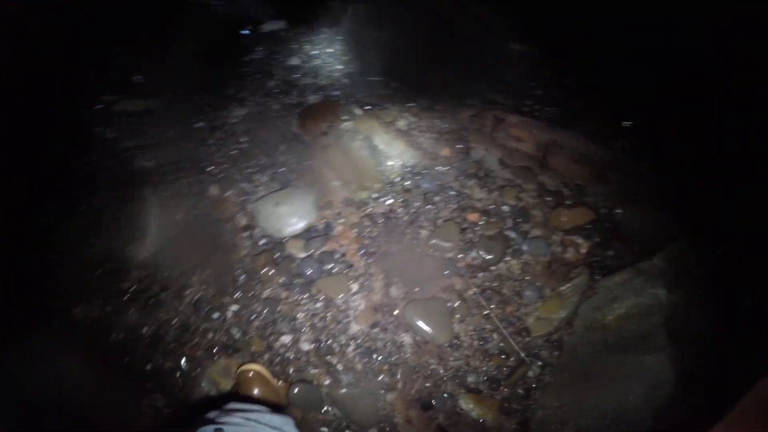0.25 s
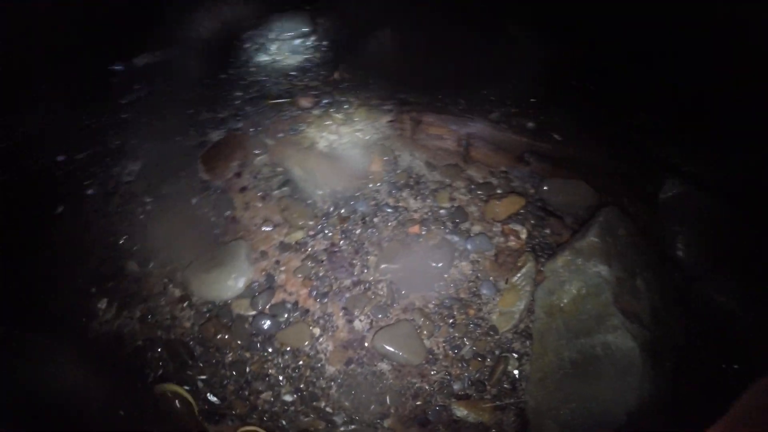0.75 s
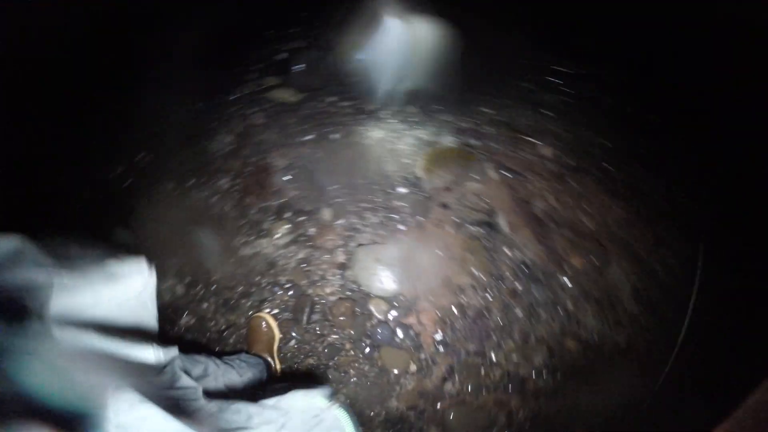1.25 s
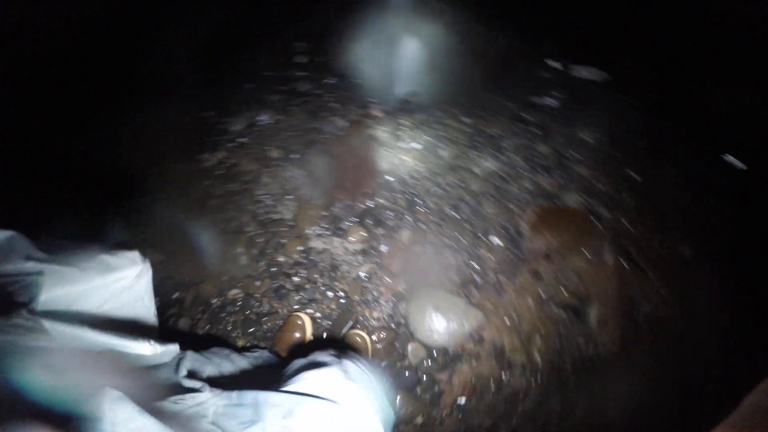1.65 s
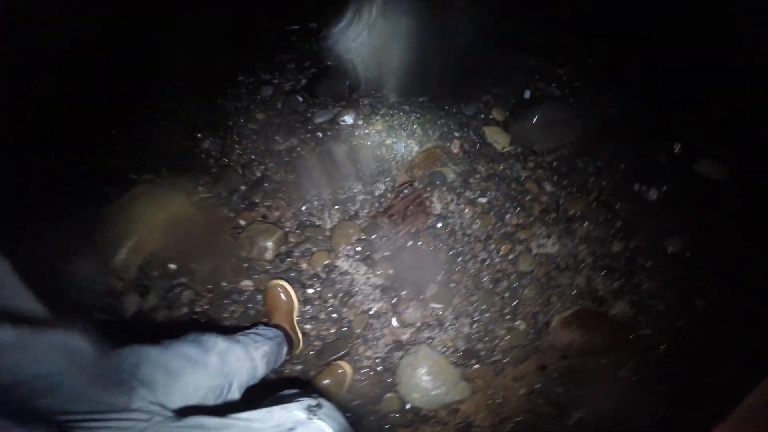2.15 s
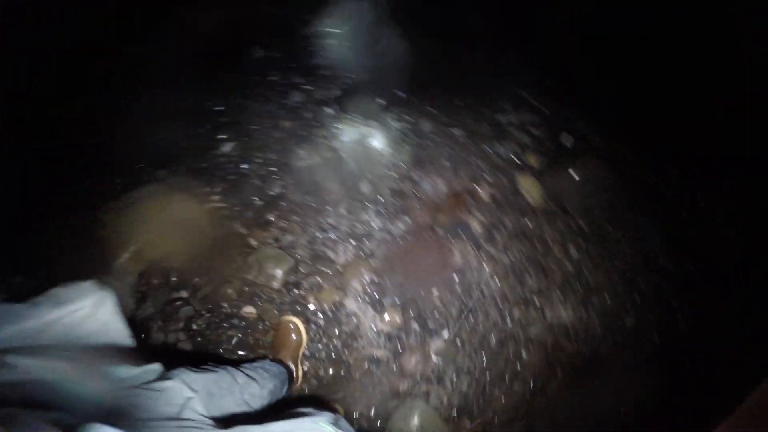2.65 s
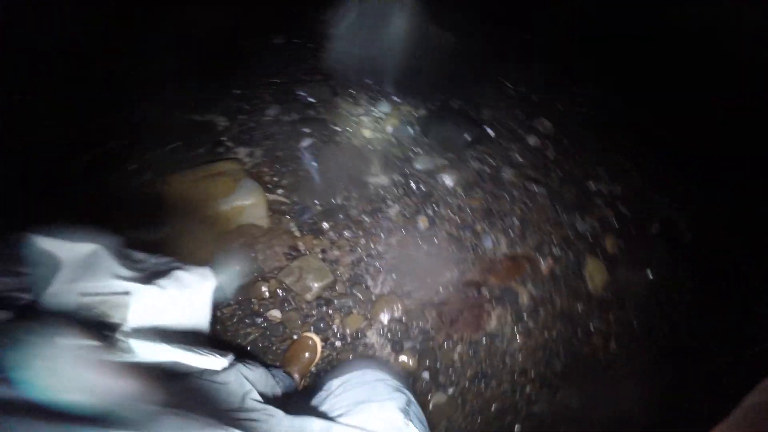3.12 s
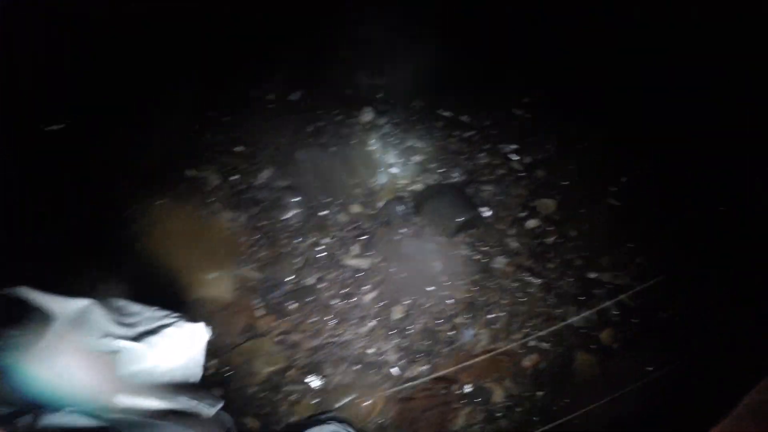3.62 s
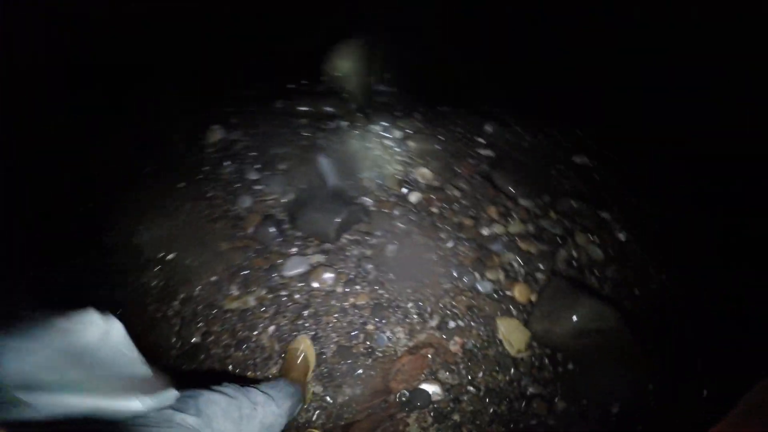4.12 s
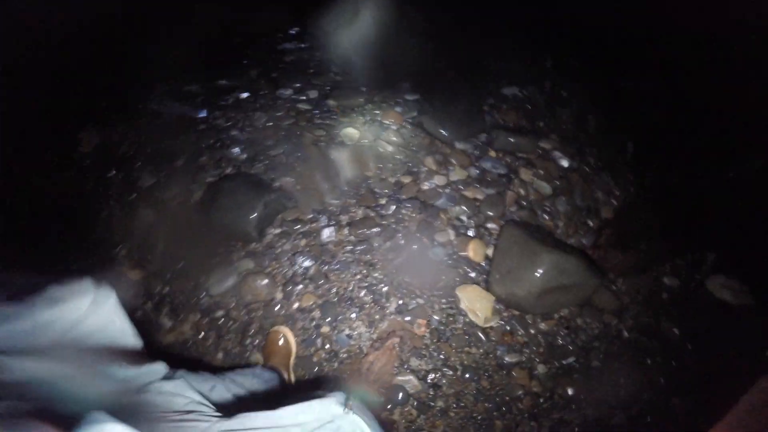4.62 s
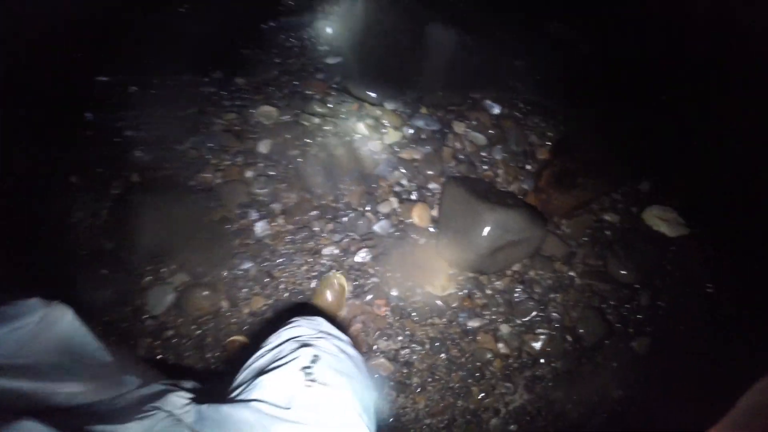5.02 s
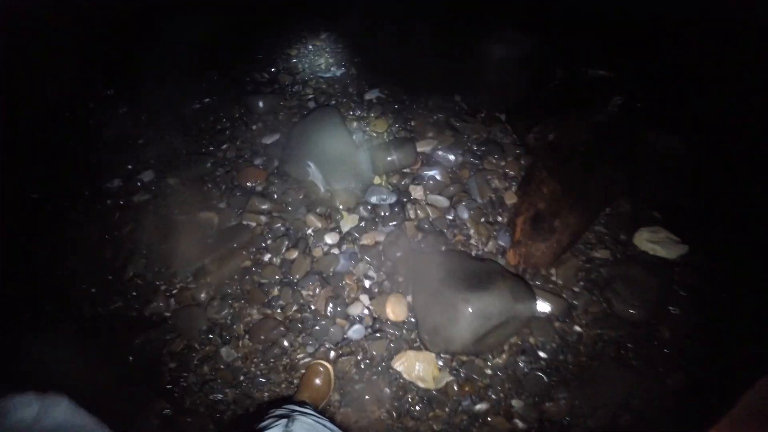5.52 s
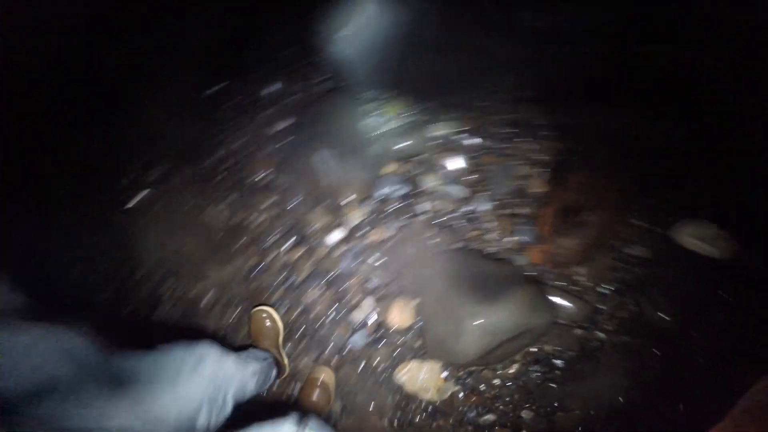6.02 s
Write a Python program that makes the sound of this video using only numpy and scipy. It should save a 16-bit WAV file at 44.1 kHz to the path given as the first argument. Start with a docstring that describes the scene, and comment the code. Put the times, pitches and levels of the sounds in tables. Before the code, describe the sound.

Strong wind rumbles and rushes hollowly around a small camera in a closed case, over a soft wash of air and far surf. Someone walks on wet pebbles: low jolts, cloth rubs and heel thumps. Stones tick, then one violent clack distorts near one second; gravel crunches, and smaller clicks continue until the end.

```python
"""On a wet pebble beach at night, one microphone sits in the closed housing of a small carried camera.
From the start strong wind buffets it, rushes in the cavities and washes broadly; electronics whine faintly.
From 0.1 s filtered noise gives jolts and cloth rubs on the shell, and decaying sines give low thumps of heels.
From 0.7 s noise bursts tick and struck resonances clack as stones, the loudest near 1.1 s with a low thud; from
about 1 s grainy noise grinds as gravel. Peaks clip; a steep low-pass leaves nothing above about 15.4 kHz."""
import sys
import numpy as np
from scipy import signal
from scipy.fft import rfft, irfft
from scipy.io import wavfile
from scipy.ndimage import uniform_filter1d

SR = 44100
rng = np.random.default_rng(int(sys.argv[2]) if len(sys.argv) > 2 else 0)


def put_to_file(sound):
    """Save the sound as 16-bit audio at rate SR, in the file named by the first command-line argument."""
    columns = np.atleast_2d(sound).T  # one column per channel
    safe = np.clip(columns, -1, 1)
    whole_steps = np.round(safe * 32767)
    wavfile.write(sys.argv[1], SR, whole_steps.astype(np.int16))


N = 276507  # length [samples]

# In the mode tables in Hz, width is that of each of two cascaded resonances before a common 0.98 factor;
# stone modes ring once. Levels of these modes and of the spectra are relative: each noise is scaled to rms 1.

# Slow wind buffeting of the membrane, before gusts: (time [s], level [dB])
BUFFET_LEVEL = [(0.0, -32), (0.17, -28), (0.28, -44), (1.2, -33.5), (1.68, -40.5), (2.79, -33.5),
                (2.85, -40), (3.12, -35), (3.18, -42.5), (3.53, -24), (3.67, -28), (3.7, -22.5),
                (3.82, -39), (4.3, -32.5), (4.4, -40), (4.61, -26), (4.73, -38), (5.69, -35.5),
                (5.73, -33.5), (6.08, -41), (6.2, -38), (6.27, -38.5)]
# Spectrum of the buffeting: (frequency [Hz], relative density [dB per Hz])
BUFFET_SPECTRUM = [(8, 6), (15, -2.5), (26, -2.5), (40, -6.5), (60, -13), (120, -59)]
GUST_SPREAD_DB, GUSTS_PER_S = 1.8, 9
# Wind rushing in the cavities: (time [s], level [dB])
RUSH_LEVEL = [(0, -54.5), (.9, -56.5), (1.34, -54.5), (1.8, -49), (2.3, -50.5), (4.0, -50), (6.27, -49.5)]
# Cavity modes of the housing: (frequency [Hz], width [Hz], relative level [dB])
CAVITY_MODES = [(1838, 510, 3.5), (2015, 150, -21), (2672, 584, 2.5), (3158, 174, -6), (4770, 220, -14),
                (5530, 720, -10), (6400, 340, -29)]
# Spectrum of the air and far surf: (frequency [Hz], relative density [dB per Hz])
WASH_SPECTRUM = [(100, -8), (200, 2), (300, -1.5), (500, -3), (1000, -6), (1300, -9), (2300, -22),
                 (4100, -39.5), (7500, -26), (10000, -28.5), (12000, -27.5), (14000, -41), (15000, -38)]
WASH_DB = -57.5  # typical level, before its flicker

# Whines of the electronics, before their wavering: (frequency [Hz], level [dB rms])
WHINES = [(5846, -81), (8780, -85), (11687, -91), (11719, -86), (14595, -99), (14626, -85), (14655, -94)]

# Jolts from the steps: (time [s], hold [s], swing of the case [dB], rattle of its mount [dB])
JOLTS = [(.13, 0.03, -38, -38), (.21, .03, -40, -52), (.29, 0.052, -37, -44), (.465, 0.0098, -40.5, -46),
         (1.05, 0.1, -37, -40.5), (1.17, .13, -36, -38.5), (1.46, 0.083, -39.5, -55),
         (1.62, 0.016, -36.5, -41.5), (1.7, 0.024, -33, -46.5), (1.78, 0.023, -40, -54),
         (1.9, 0.0044, -37, -51), (2.15, 0.026, -38.5, -41.5), (2.355, 0.061, -39, -43),
         (2.415, .04, -35, -40), (2.52, 0.065, -41, -45.5), (2.95, .005, -44, -62),
         (3.03, 0.018, -39, -48.5), (3.22, 0.053, -41, -48), (3.39, .005, -39, -47),
         (3.47, 0.065, -38.5, -48), (3.703, .03, -30, -39), (3.76, .01, -32.5, -47),
         (4.42, 0.026, -42.5, -54), (4.47, 0.069, -36.5, -37), (4.59, 0.083, -40.5, -46.5),
         (4.91, 0.0046, -38, -66), (4.99, 0.0057, -39, -58), (5.1, 0.026, -46, -45.5),
         (5.767, 0.0035, -36.5, -41.5), (5.83, .01, -47, -46), (5.877, 0.016, -36.5, -42),
         (5.963, .005, -39, -42.5), (6.045, 0.038, -37.5, -37)]
# Modes of the swinging case: (frequency [Hz], width [Hz], relative level [dB])
CASE_MODES = [(77.6, 35, -2.5), (98, 34.8, -1.5), (121, 56, -9)]
# Modes of the rattling mount: (frequency [Hz], width [Hz], relative level [dB])
MOUNT_MODES = [(201.2, 61, 2.5), (254.4, 46, -5), (297, 53, -14.5), (410, 1100, -16.5)]
JOLT_ATTACK_S, JOLT_RELEASE_S = 0.009, 0.032
SWING_REST_DB, RATTLE_REST_DB = -50.5, -55.5

# Cloth slipping on the shell: (time [s], hold [s], low panels [dB], high panels [dB])
SLIPS = [(.14, 0.021, -49, -54), (.21, 0.011, -54, -52), (.29, 0.037, -48.5, -51.5),
         (.47, 0.0041, -53.5, -61), (.73, 0.0032, -55, -52), (1.05, 0.085, -49.5, -49.5),
         (1.165, 0.012, -46, -51), (1.22, 0.086, -53, -51.5), (1.73, 0.0041, -57, -53),
         (2.19, 0.054, -60, -49.5), (2.385, 0.066, -48, -47), (2.48, .03, -69, -51), (2.56, .005, -54, -53),
         (2.6, 0.0045, -55.5, -56), (3.16, 0.0074, -53, -56), (3.22, .005, -55, -50),
         (3.38, 0.033, -49.5, -45.5), (3.475, 0.073, -48.5, -47), (3.712, 0.011, -42.5, -39.5),
         (4.47, 0.12, -52.5, -46.5), (4.6, 0.028, -51.5, -47), (4.7, 0.0041, -57, -62),
         (4.82, 0.0045, -54, -57), (4.89, .005, -56, -60), (5.88, 0.0054, -55, -50),
         (5.958, .002, -50, -61), (6.08, 0.015, -49.5, -49.5)]
# Modes of the low shell panels: (frequency [Hz], width [Hz], relative level [dB])
LOW_PANEL_MODES = [(664, 122, -5.5), (728, 160, -3), (967, 89, 3), (1059, 57, -1.5)]
# Modes of the high shell panels: (frequency [Hz], width [Hz], relative level [dB])
HIGH_PANEL_MODES = [(1499, 27, 0), (1571, 174, 6.5), (1920, 200, 2.5), (2360, 510, 4), (2820, 450, 1),
                    (3270, 190, -9)]
SLIP_ATTACK_S, SLIP_RELEASE_S = 0.007, 0.027
LOW_REST_DB, HIGH_REST_DB = -69, -61.5

# Low thumps of heels, and the low thud under the loudest clack:
# (time [s], peak [dB], ring [Hz], 60 dB decay time [s])
THUMPS = [(0.15, -26, 115, 0.054), (1.1086, -16, 264, 0.015), (1.256, -29.5, 107.4, 0.18),
          (3.536, -21, 70, 0.059), (3.701, -16, 87, 0.086), (4.532, -22, 97, 0.15),
          (5.764, -31.5, 170, 0.035), (5.874, -31.5, 117, 0.094), (4.26, -34, 73, 0.059),
          (6.078, -36, 130, 0.32)]

# Small treble ticks: (time [s], peak [dB], ring [Hz])
TICKS = [(0.7342, -52, 8090), (0.9695, -38.5, 7700), (2.578, -48, 9240), (2.6668, -63, 8770),
         (2.7536, -53, 9720), (2.8484, -55, 9960), (2.9098, -58, 10000), (3.4695, -57, 8770),
         (3.5, -52, 8690), (3.5817, -45, 8900), (3.5987, -48, 9650), (3.6564, -42.5, 9100),
         (3.6684, -47, 9600), (3.696, -58, 8860), (5.855, -41, 8200), (6.0854, -49, 7650),
         (6.223, -47, 7650)]

# Stone clacks: (time [s], peak [dB], ring [Hz], crack relative to the peak [dB],
# rebound delay [s], rebound relative to the first touch [dB])
CLACKS = [(0.7353, -24.5, 2720, -31, 0.0008, -26), (0.969, -19, 1860, -22, 0.00078, 3.5),
          (.995, -35, 4600, -8, 0.00048, 2), (1.1096, 1.2, 1820, -28, .00079, 7.5),
          (1.241, -30.5, 2030, -24, 0.00055, 9), (1.718, -31.5, 2860, -25, 0.00035, -7),
          (1.9557, -30.5, 2120, -21, 0.00053, 12), (2.499, -48, 4700, -20, .0005, 6),
          (2.619, -36, 4500, -17, 0.00058, 1), (2.679, -42, 4000, -18, .0005, 1),
          (3.036, -47, 4900, -20, .0005, 1), (3.113, -39, 4800, -20, 0.00057, 1),
          (3.067, -34, 4800, -14, 0.00061, 3), (3.088, -33, 3120, -20, 0.00063, 1),
          (3.715, -28, 2340, -32, 0.00125, 0), (3.9084, -18, 2640, -18, 0.00059, 9),
          (5.469, -36, 2650, -24, 0.00037, 2), (5.8551, -29.5, 2480, -17, 0.0002, 4),
          (6.086, -34, 4650, -14, 0.0006, 12), (6.2228, -27.5, 2800, -28, 0.00044, 13)]
# Modes of a stone: (share of the ring frequency [ratio], width as share of the mode frequency [ratio],
# level before weighting by share / width [dB])
STONE_MODES = [(.135, 0.79, -57), (.85, 0.077, -27.5), (1.03, 0.24, 28.5), (1.28, 0.089, 2),
               (2.03, 0.092, 1), (2.7, 0.11, -5)]

# Gravel grinding under a boot: (time [s], hold [s], level [dB])
CRUNCHES = [(.98, 0.11, -58.5), (1.1, .005, -54.5), (1.17, 0.029, -56), (1.31, 0.012, -56.5),
            (1.69, 0.011, -48), (1.75, 0.067, -59.5), (1.9, .005, -58), (2.0, .005, -64), (2.32, .01, -65),
            (2.39, 0.098, -57), (2.603, 0.012, -51.5), (2.68, 0.0092, -59), (3.034, .1, -54.5),
            (3.61, .02, -62), (3.67, .005, -61), (4.49, 0.016, -56.5), (4.79, .005, -61),
            (5.41, 0.018, -61.5), (5.468, 0.0062, -53.5), (5.57, .002, -58), (5.63, 0.027, -57.5),
            (5.71, 0.043, -64), (6.09, .005, -64), (6.23, .01, -68)]
# Modes of the gravel: (frequency [Hz], width [Hz], relative level [dB])
GRAVEL_MODES = [(3080, 880, 6), (4960, 1500, -1), (5400, 1070, 7.5), (6130, 520, 3), (8030, 3000, -3.5),
                (9630, 540, -11), (11700, 4800, -13)]
CRUNCH_ATTACK_S, CRUNCH_RELEASE_S, CRUNCH_REST_DB = 0.005, 0.042, -67.5

TOP_HZ = 15400  # upper edge of the sound


def undb(db):
    """Gain of a level in dB."""
    return 10 ** (np.asarray(db) / 20)


def unit(x):
    """Scaled to rms 1."""
    return x / np.sqrt(np.mean(x ** 2))


def level_curve(table):
    """Gain at every sample, interpolated in dB between the points of a table."""
    s, db = np.transpose(table)
    return undb(np.interp(np.arange(N) / SR, s, db))


def ring(x, hz, width):
    """Two-pole resonance, gain 1 at the centre."""
    hz = min(hz, SR / 2.2)
    b, a = signal.iirpeak(hz, hz / max(width, 1), fs=SR)
    return signal.lfilter(b, a, x)


def ring_twice(x, hz, width):
    """Two equal resonances in a row, for steeper skirts."""
    return ring(ring(x, hz, width), hz, width)


def walk(rate):
    """Random levels held 1 / rate s, then smoothed twice over that time; rms 1."""
    k = int(SR / rate)
    held = rng.standard_normal(1024)[np.arange(N) // k % 1024]
    return unit(uniform_filter1d(uniform_filter1d(held, k), k))


def coloured(points):
    """Steady noise with a given spectrum, rms 1."""
    hz, db = np.transpose(points)
    f = np.maximum(np.fft.rfftfreq(N, 1 / SR), 1)
    gain = undb(np.interp(np.log(f), np.log(hz), db, left=-80, right=-80))
    return unit(irfft(rfft(rng.standard_normal(N)) * gain, N))


def flickering_noise(spread_db, rate):
    """White noise whose level wanders at random."""
    return rng.standard_normal(N) * undb(spread_db * walk(rate))


def grains(rate, spread_db):
    """Random small impacts, most faint and a few strong; rms 1."""
    hit = rng.random(N) < rate / SR
    size = rng.exponential(1, N)
    sign = np.sign(rng.standard_normal(N))
    return unit(hit * sign * undb(spread_db * np.minimum(size, 3.5)))


def body(drive, modes, flicker_db, rate):
    """A drive through steep resonances, each flickering on its own; rms 1."""
    out = np.zeros(N)
    for hz, width, db in modes:
        tone = unit(ring_twice(drive, hz, 0.98 * width))
        out += undb(db + flicker_db * walk(rate)) * tone
    return unit(out)


def bursts(table, attack_s, release_s, rest_db):
    """Gains of each dB column: rows swell up to their time, hold and die away over a restless resting level."""
    s, hold_s, *columns = np.transpose(table)[:, :, None]
    t = np.arange(0, N, 64) / SR  # coarse steps, interpolated below
    swell = -0.5 * (np.minimum(t - s, 0) / attack_s) ** 2
    decay = -np.maximum(t - s - hold_s, 0) / release_s
    shape = np.exp(swell + decay)
    gains = []
    for db, rest in zip(columns, rest_db):
        coarse_power = np.sum((undb(db) * shape) ** 2, axis=0)
        power = np.interp(np.arange(N) / SR, t, coarse_power)
        gains.append(np.sqrt(power + undb(rest + 1.4 * walk(13)) ** 2))
    return gains


def add(out, s, sound, peak_db):
    """Lays a short sound in at time s, its peak scaled to peak_db."""
    i = int(s * SR)
    piece = sound[:N - i]
    out[i:i + len(piece)] += undb(peak_db) * piece / np.abs(sound).max()


def wind_buffeting():
    """Slow pressure swings on the membrane: low noise that gusts at random."""
    gusts = undb(GUST_SPREAD_DB * walk(GUSTS_PER_S))
    return level_curve(BUFFET_LEVEL) * gusts * coloured(BUFFET_SPECTRUM)


def cavity_rush():
    """Eddies, as unsteady noise with small impacts, sound the resonances of the cavities."""
    eddies = flickering_noise(1.6, 40) + 0.88 * grains(1500, 0.31)
    return level_curve(RUSH_LEVEL) * body(eddies, CAVITY_MODES, 0.19, 25.5)


def air_and_surf_wash():
    """The broad wash of air and far surf: coloured noise with a slight flicker."""
    return undb(WASH_DB + 0.5 * walk(45)) * coloured(WASH_SPECTRUM)


def electronics():
    """Thin sine whines, each wavering in level."""
    t = np.arange(N) / SR
    out = np.zeros(N)
    for hz, db in WHINES:
        gain = np.sqrt(2) * undb(db + 1.4 * walk(9.1))  # root 2 turns rms into amplitude
        out += gain * np.sin(2 * np.pi * hz * t)
    return out


def case_jolts():
    """Jolts from the steps drive the low modes of the case and the rattle of its mount."""
    swing, rattle = bursts(JOLTS, JOLT_ATTACK_S, JOLT_RELEASE_S, (SWING_REST_DB, RATTLE_REST_DB))
    shaking = flickering_noise(1.5, 30)
    return swing * body(shaking, CASE_MODES, 0.91, 4) + rattle * body(shaking, MOUNT_MODES, 0.57, 34)


def cloth_slips():
    """Cloth slipping on the shell, as noise and grains, excites its low and high panels."""
    low, high = bursts(SLIPS, SLIP_ATTACK_S, SLIP_RELEASE_S, (LOW_REST_DB, HIGH_REST_DB))
    friction = flickering_noise(1.6, 90) + 0.9 * grains(700, 2.0)
    return low * body(friction, LOW_PANEL_MODES, 1.2, 35) + high * body(friction, HIGH_PANEL_MODES, 1.5, 35)


def low_thumps():
    """Low thumps of heels, and the thud under the loudest clack: decaying sines with a weaker overtone."""
    out, t = np.zeros(N), np.arange(SR // 3) / SR
    for s, peak_db, hz, t60 in THUMPS:
        rise = 1 - np.exp(-t / 0.0054)
        decay = np.exp(-np.log(1000) * t / t60)
        tone = np.sin(2 * np.pi * hz * t) + 0.086 * np.sin(2 * np.pi * 2.8 * hz * t)
        add(out, s, rise * decay * tone, peak_db)
    return out


def treble_ticks():
    """Tiny bright ticks: a noise burst of a millisecond or two in two high modes."""
    out = np.zeros(N)
    for s, peak_db, hz in TICKS:
        burst = rng.standard_normal(512) * np.exp(-np.arange(512) / (0.0014 * SR))
        tick = ring_twice(burst, hz, 2100) + 0.15 * ring_twice(burst, 1.54 * hz, 1800)
        add(out, s, tick, peak_db)
    return out


def stone_clacks():
    """A touch and a rebound ring the stone for a few cycles; a bare crack rides on the rebound."""
    out, t = np.zeros(N), np.arange(1024) / SR
    for s, peak_db, hz, crack_db, rebound_s, rebound_db in CLACKS:
        contact_s = 0.16 / hz  # hard small stones touch briefly and ring high
        first = np.exp(-0.5 * ((t - 3 * contact_s) / contact_s) ** 2)
        rebound = np.exp(-0.5 * ((t - rebound_s - 3 * contact_s) / contact_s) ** 2)
        touch = -first - undb(rebound_db) * rebound
        tone = np.zeros(len(t))
        for share, width, db in STONE_MODES:
            mode_hz = share * hz
            tone += undb(db) * share / width * ring(touch, mode_hz, width * mode_hz)
        add(out, s, tone, peak_db)
        crack = rng.standard_normal(64) * np.exp(-np.arange(64) / 9)
        add(out, s + 1.4 * rebound_s, ring(crack, 6500, 9000), peak_db + crack_db)
    return out


def gravel_crunches():
    """Gravel grinding under the boots: unsteady noise and many small impacts ring the pebbles."""
    (crunch,) = bursts(CRUNCHES, CRUNCH_ATTACK_S, CRUNCH_RELEASE_S, (CRUNCH_REST_DB,))
    grinding = flickering_noise(2.5, 90) + 1.6 * grains(500, 3.5)
    return crunch * body(grinding, GRAVEL_MODES, 0.5, 30)


def scene():
    """All sources summed at the single microphone."""
    air = wind_buffeting() + cavity_rush() + air_and_surf_wash()
    handling = case_jolts() + cloth_slips() + low_thumps()
    beach = stone_clacks() + gravel_crunches()
    return (air + electronics() + handling + treble_ticks() + beach)[None]


def record(dry):
    """Peaks clip at full scale and a steep low-pass leaves nothing above about 15.4 kHz."""
    low_pass = signal.ellip(8, 0.2, 70, TOP_HZ, fs=SR, output="sos")
    return signal.sosfilt(low_pass, np.clip(dry, -1, 1))


dry = scene()
out = record(dry)
put_to_file(out)
```